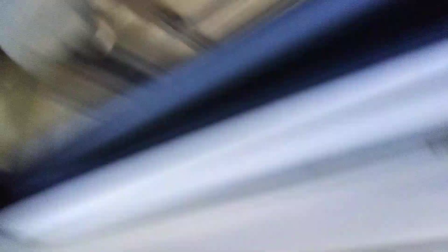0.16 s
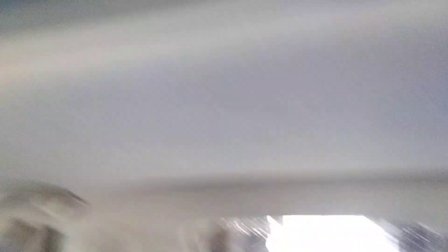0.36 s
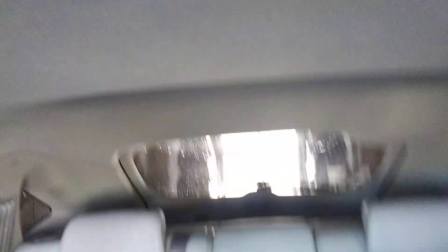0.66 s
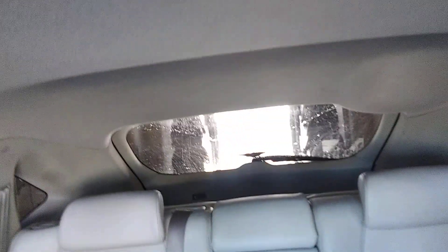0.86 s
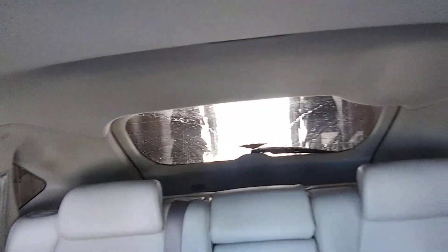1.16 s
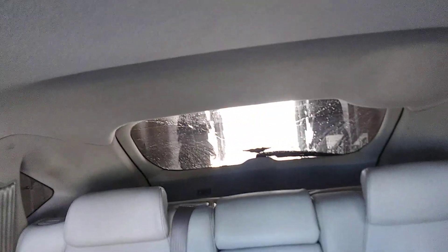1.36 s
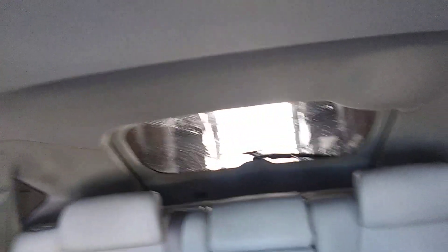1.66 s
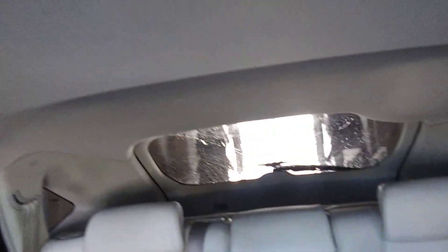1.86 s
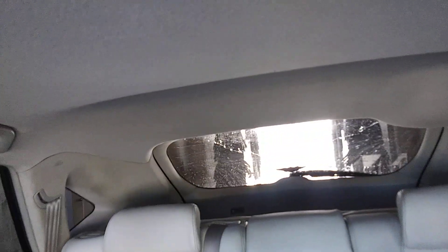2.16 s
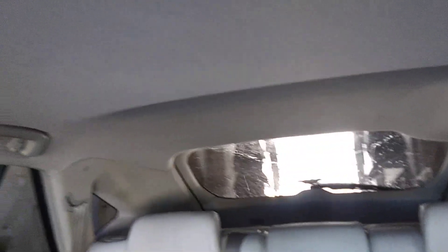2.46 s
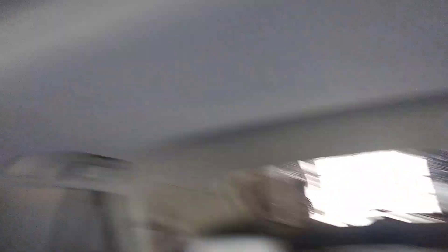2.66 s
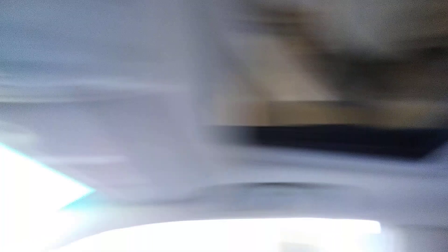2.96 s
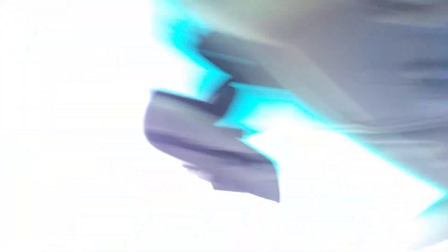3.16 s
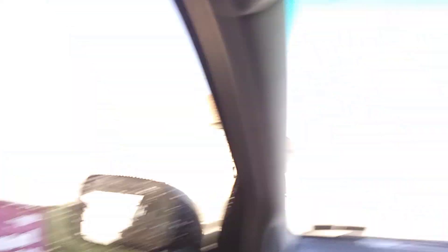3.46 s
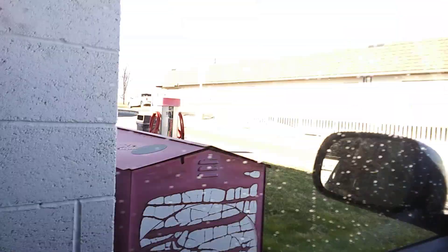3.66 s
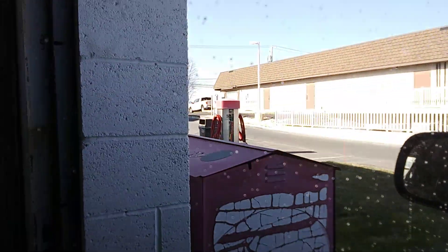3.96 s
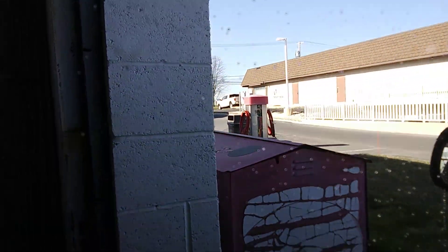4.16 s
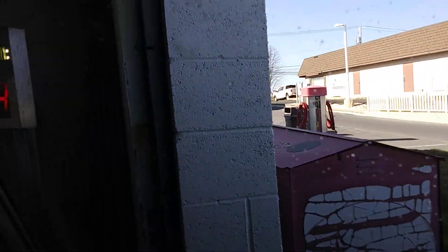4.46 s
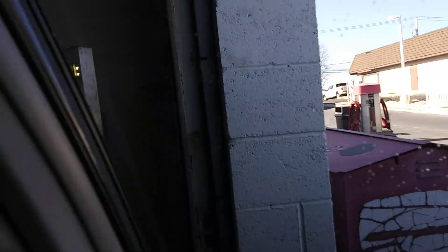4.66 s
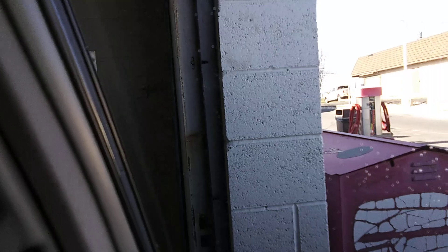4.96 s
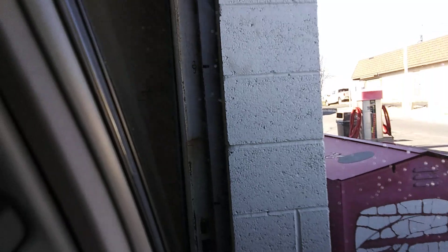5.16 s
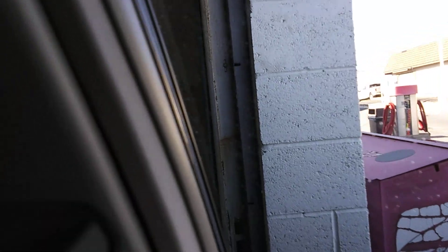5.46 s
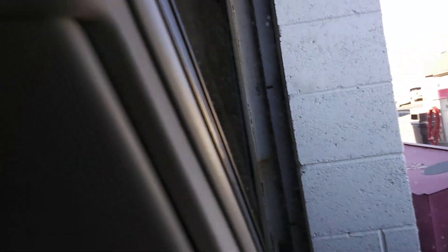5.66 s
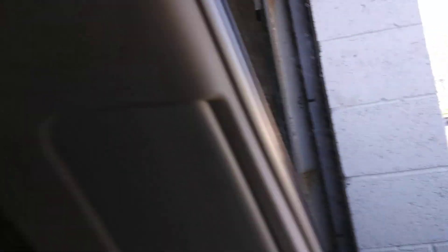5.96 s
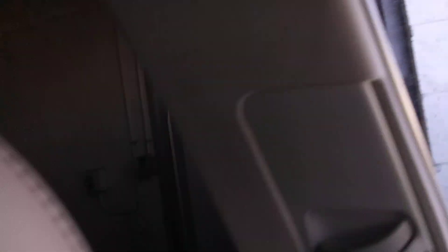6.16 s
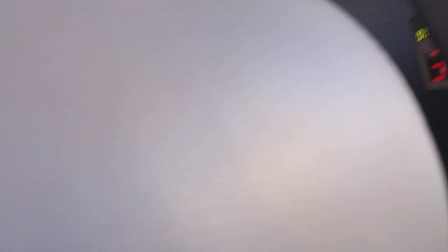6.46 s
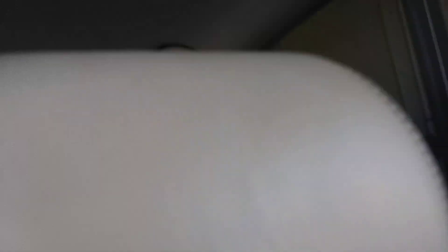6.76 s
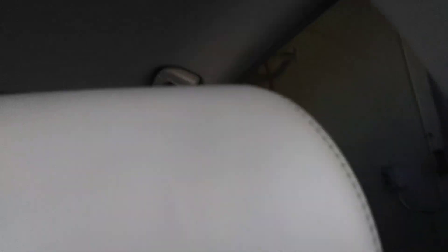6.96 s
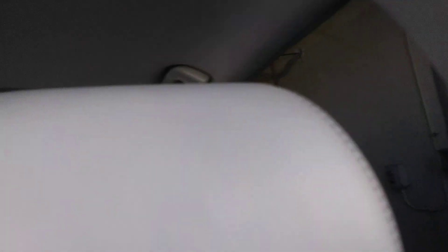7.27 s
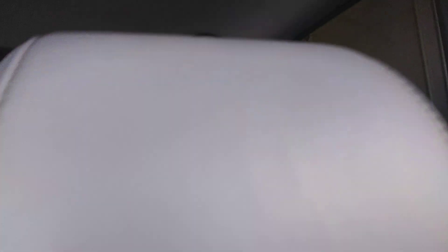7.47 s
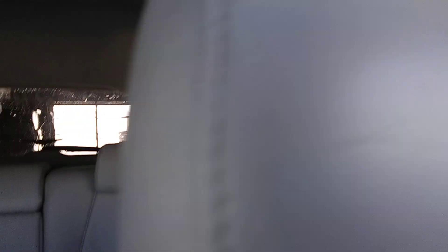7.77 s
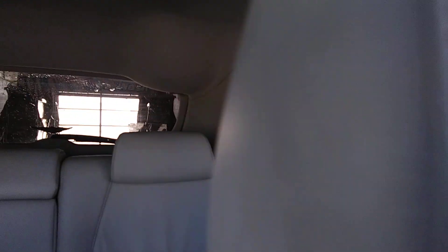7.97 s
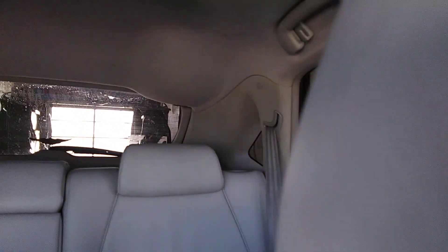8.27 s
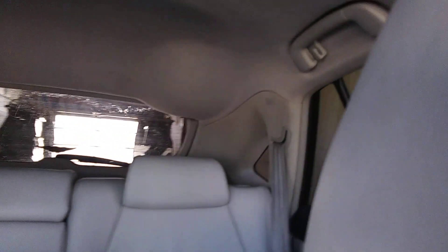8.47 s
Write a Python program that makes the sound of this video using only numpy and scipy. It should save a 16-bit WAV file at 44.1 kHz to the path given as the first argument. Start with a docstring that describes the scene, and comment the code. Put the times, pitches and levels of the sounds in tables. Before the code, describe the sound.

A loud, steady rush of air surrounds a car in a car wash dryer, with low rumble from the body panels and a thin hiss of droplets on the glass. The microphone moves inside the cabin: the boom rises slightly in pitch early on, and a light sizzle appears near a side window midway. Later the faint blower hum comes forward in short swells and deep gusts buffet the car.

```python
"""Car wash dryer from inside the car

Turbulent air jets buffet the roof and doors, and the panels drive the cabin's air modes into a boom.
The rush hisses through the glass and flings fine spray at it; the blower fans hum faintly at their
blade-pass frequency. The balance shifts as the microphone is turned and moved through the cabin's
standing waves, and a limiter holds the peaks."""
import sys
import numpy as np
from scipy import signal
from scipy.fft import rfft, irfft
from scipy.io import wavfile
from scipy.ndimage import uniform_filter1d, minimum_filter1d

SR = 44100
rng = np.random.default_rng(int(sys.argv[2]) if len(sys.argv) > 2 else 0)


def wav_out(sig):
    """Save sig, one row per channel (or a flat mono array), as 16-bit PCM at SR to the path in sys.argv[1]."""
    wavfile.write(sys.argv[1], SR, np.round(np.clip(np.atleast_2d(sig).T, -1, 1) * 32767).astype(np.int16))


N = 379260
TIME = np.arange(N) / SR
FREQS = np.fft.rfftfreq(N, 1 / SR) + 1e-3

# air modes of the cabin: f/Hz, width/Hz, relative level/dB
LOW_BOOM_MODES = [(127.6, 34, 0)]
HIGH_BOOM_MODES = [(186, 32, -1.9), (219.9, 39.4, 1), (253, 35.6, 0.75), (287.4, 26.6, -0.5)]
PILLAR_MODES = [(357, 42, 0)]
# spectral densities of the broadband sources: f/Hz, relative level/dB
PANEL_SPECTRUM = [(20, -39.5), (35, -34.5), (48, -24), (60, -14), (78, -6), (100, 0), (140, 0), (168, 2),
                  (240, -3), (320, -3.5), (390, -7.5), (600, -14), (1200, -56)]
ROAR_SPECTRUM = [(250, -21.5), (420, 2.5), (580, -1), (780, -2), (950, -8.5), (1400, -18.5), (3000, -49.5)]
HISS_SPECTRUM = [(500, -18), (900, 0), (1150, 1.5), (1700, 0), (2150, 0), (2600, -2), (3200, -8),
                 (3900, -14.5), (4600, -28), (6000, -44)]
SPRAY_SPECTRUM = [(2500, -10.5), (4000, 0.5), (4900, -4), (5400, 0.9), (5800, 1), (6200, 2.5), (6550, 0),
                  (7350, 0), (7750, -12.5), (8400, -22)]
SIZZLE_SPECTRUM = [(2800, -12), (3800, 8), (4600, -7.5), (5250, 3), (5950, -8), (6300, -5), (6550, -11),
                   (6950, -1), (7400, -6.5), (8400, -23)]
# envelopes of the jets, the hiss higher when facing the side windows: t/s, level/dB
ROAR_ENVELOPE = [(0, -23), (.3, -20.3), (.8, -24), (1.9, -24), (2.8, -20.5), (3.8, -25.5), (5.7, -26),
                 (6.4, -21), (7.5, -21.5), (7.95, -18.5), (8.6, -21)]
HISS_ENVELOPE = [(0, -24), (.5, -24), (.8, -25.5), (1.8, -27), (2.1, -25.5), (2.85, -24), (4.8, -23),
                 (6.4, -23.5), (6.7, -25.5), (7.1, -25.5), (8.6, -27.5)]
# blade-pass partials: harmonic number, relative level/dB
BLADE_HARMONICS = [(1, -2.5), (2, -21.5), (3, -20.5)]
# swells of the fan hum: peak t/s, duration/s, rise/dB
FAN_SWELLS = [(4.8, 1.0, 6.5), (5.27, 0.91, 11.8), (7.22, 1.2, 11.5), (7.78, 0.46, 12), (8.26, 0.49, 12)]
# gusts, deep on the panels and bright on the glass: peak t/s, duration/s, f/Hz, width/Hz, level/dB
AIR_GUSTS = [(.19, .22, 2100, 1000, -27), (.42, .3, 2200, 900, -30), (1.02, .25, 2200, 1200, -32),
             (2.35, 1.56, 385, 70, -21.5), (2.85, 0.84, 2100, 1000, -34), (7.1, .8, 155, 35, -16),
             (7.15, 1.1, 1260, 500, -30), (8.1, 1.2, 854, 70, -35), (8.25, 0.77, 170, 35, -16.5)]
# resonances in mid-cabin: frequency ratio, relative level/dB
MID_CABIN_MODES = [(1, 0), (1.65, -13.5)]
# water swept over the glass by the jets: peak t/s, duration/s, f/Hz, width/Hz, level/dB
WATER_SURGES = [(2.5, .7, 6800, 1500, -55), (4.36, .35, 6450, 1500, -51), (6.22, .38, 7200, 650, -53),
                (7.15, .8, 6650, 650, -51), (7.7, 0.63, 6200, 600, -55)]
# microphone positions: entry t/s, exit t/s, ramp duration/s
FACING_REAR = (-1, 1.8, .4)
MID_CABIN = (0.6, 2.38, 1)
BY_PILLAR = (2.99, 5.67, .5)
BY_DOOR = (3.1, 4.46, 0.34)
BY_WINDOW = (3.7, 4.68, 0.7)
BEHIND_SEAT = (8.14, 10, .5)


def undb(db):
    """Amplitude ratio of a level in decibels."""
    return 10 ** (np.asarray(db) / 20)


def unit(x):
    """Normalisation to rms 1."""
    return x / np.sqrt(np.mean(x ** 2))


def noise():
    """Gaussian white noise, the model of turbulence."""
    return rng.standard_normal(N)


def colour(x, spectrum):
    """Linear filtering by a response of f/Hz, level/dB; rms 1."""
    hz, db = np.transpose(spectrum)
    response = undb(np.interp(np.log(FREQS), np.log(hz), db))
    return unit(irfft(rfft(x) * response, N))


def resonate(modes):
    """Forced resonance: each mode is driven by its own patch of turbulence; rms 1."""
    spectrum = 0
    for hz, width, db in modes:
        detuning = hz / width * (FREQS / hz - hz / FREQS)
        spectrum += undb(db) * rfft(noise()) / (1 + 1j * detuning) ** 2
    return unit(irfft(spectrum, N))


def fluctuation(rate_hz):
    """Band-limited random modulation, rolling off above rate_hz; rms 1."""
    response = np.exp(-(FREQS / rate_hz) ** 2) * (FREQS > rate_hz / 8)
    return unit(irfft(rfft(noise()) * response, N))


def gliding_band(hz, width_hz):
    """Quadrature modulation centres a band of noise on a moving frequency; rms 1."""
    lowpass = 1 + (2 * FREQS / width_hz) ** 2
    eddies = [irfft(rfft(noise()) / lowpass, N) for _ in range(2)]
    phase = 2 * np.pi * np.cumsum(hz) / SR
    return unit(eddies[0] * np.cos(phase) + eddies[1] * np.sin(phase))


def curve(envelope):
    """Linear interpolation of an envelope in time."""
    return np.interp(TIME, *np.transpose(envelope))


def presence(position):
    """Trapezoidal weight: 1 while the microphone is at a position, 0 elsewhere."""
    entry_s, exit_s, ramp_s = position
    return np.clip(.5 + np.minimum(TIME - entry_s, exit_s - TIME) / ramp_s, 0, 1)


def bump(peak_s, length_s):
    """Raised-cosine window, from 0 to 1 and back."""
    return np.cos(np.pi * np.clip((TIME - peak_s) / length_s, -.5, .5)) ** 2


def panel_rumble(level_db=-12.5):
    """Forced vibration: eddies drum on the sheet metal, 1 dB weaker far from it in mid-cabin."""
    return colour(noise(), PANEL_SPECTRUM) * undb(level_db - presence(MID_CABIN))


def cabin_boom(low_db=-26.5, high_db=-15.5):
    """Panel-driven standing waves: the low one peaks at the door, the high ones fade by the pillar."""
    low = resonate(LOW_BOOM_MODES) * undb(low_db + 9.5 * presence(BY_DOOR))
    high = resonate(HIGH_BOOM_MODES) * undb(high_db - 3 * presence(BY_PILLAR))
    return low + high


def jets(roar_db, hiss_db, flutter_db=0.8):
    """Turbulent jet noise: the flapping jet modulates roar and hiss together."""
    flutter = flutter_db * fluctuation(24)
    roar = colour(noise(), ROAR_SPECTRUM) * undb(roar_db + flutter)
    hiss = colour(noise(), HISS_SPECTRUM) * undb(hiss_db + flutter)
    return roar + hiss


def spray(hiss_db, base_db=-49, drops_per_s=800, scatter_db=4.0, splash_s=0.001):
    """Impact noise: droplets of very uneven size tick on the windows over a fine mist."""
    hits = rng.random(N) < drops_per_s / SR
    sizes = undb(scatter_db * np.minimum(rng.exponential(size=N), 5))
    splashes = signal.lfilter([1], [1, -np.exp(-1 / (splash_s * SR))], hits * sizes)
    drops = colour(noise() * splashes, SPRAY_SPECTRUM) * undb(-4)
    mist = colour(noise(), SPRAY_SPECTRUM) * undb(-2)
    facing_db = .3 * (hiss_db - hiss_db.mean())  # towards the glass, spray grows with the hiss
    position_db = 0.5 * presence(BY_WINDOW) - 1.2 * presence(FACING_REAR)
    shadow_db = -7.5 * presence(BEHIND_SEAT)
    return (drops + mist) * undb(base_db + facing_db + position_db + shadow_db)


def fan_hum(blade_hz=526.5, base_db=-33, wander=0.0049, waver_db=2.0):
    """Blade-pass tone: gusty air modulates its frequency and the level of each harmonic."""
    hz = blade_hz * (1 + wander * fluctuation(9))
    phase = 2 * np.pi * np.cumsum(hz) / SR
    tone = sum(undb(db + waver_db * fluctuation(9)) * np.sin(k * phase) for k, db in BLADE_HARMONICS)
    swell_db = sum(db * bump(peak_s, length_s) for peak_s, length_s, db in FAN_SWELLS)
    return unit(tone) * undb(base_db + swell_db)


def pillar_ring(base_db=-27):
    """A narrow cavity resonance of the cabin, stronger beside the door pillar."""
    return resonate(PILLAR_MODES) * undb(base_db + 4.5 * presence(BY_PILLAR))


def surges(table, sputter_db, sputter_hz):
    """Flow noise of passing air or water: Gaussian bands share one sputtering amplitude modulation."""
    bursts = 0
    for peak_s, length_s, hz, width, db in table:
        response = np.exp(-((FREQS - hz) / width) ** 2)
        rush = unit(irfft(rfft(noise()) * response, N))
        bursts += rush * undb(db) * bump(peak_s, length_s)
    return bursts * unit(undb(sputter_db * fluctuation(sputter_hz)))


def mid_cabin_boom(entry_hz=198.1, climb_hz_per_s=34, width_hz=105, level_db=-9.7):
    """A boom that climbs in pitch as the microphone drifts through the standing waves of mid-cabin."""
    hz = entry_hz + climb_hz_per_s * (TIME - MID_CABIN[0])
    boom = sum(undb(db) * gliding_band(ratio * hz, width_hz) for ratio, db in MID_CABIN_MODES)
    return boom * undb(level_db) * presence(MID_CABIN)


def window_sizzle(level_db=-44, flicker_db=3.5):
    """Treble noise under rapid amplitude modulation, heard only close to the side window."""
    sizzle = colour(noise(), SIZZLE_SPECTRUM)
    return sizzle * undb(level_db + flicker_db * fluctuation(70)) * presence(BY_WINDOW)


def scene():
    """Superposition of air, water and fan noise at the moving microphone, in mono."""
    hiss_db = curve(HISS_ENVELOPE)
    cabin = panel_rumble() + cabin_boom() + mid_cabin_boom()
    rush = jets(curve(ROAR_ENVELOPE), hiss_db)
    gusts = surges(AIR_GUSTS, sputter_db=2.5, sputter_hz=18)
    water = spray(hiss_db) + surges(WATER_SURGES, sputter_db=4.0, sputter_hz=60)
    return (cabin + rush + gusts + water + fan_hum() + pillar_ring() + window_sizzle())[None]


def record(dry):
    """Look-ahead limiting ducks each high peak; a steep low-pass filter then cuts the top."""
    ceiling, window_samples, cutoff_hz = .89, 161, 7750
    needed_gain = np.minimum(1, ceiling / (np.abs(dry) + 1e-9))
    held_gain = minimum_filter1d(needed_gain, size=window_samples)
    gain = uniform_filter1d(held_gain, size=window_samples)
    lowpass = signal.ellip(10, .2, 85, cutoff_hz, fs=SR, output="sos")
    return signal.sosfilt(lowpass, dry * gain)


dry = scene()
out = record(dry)
wav_out(out)
```